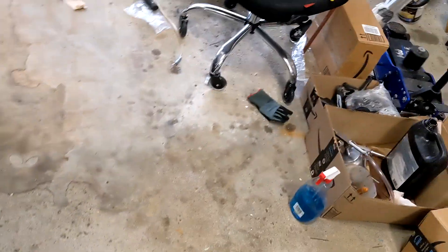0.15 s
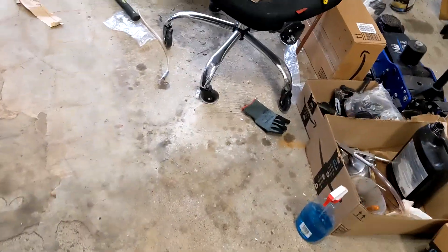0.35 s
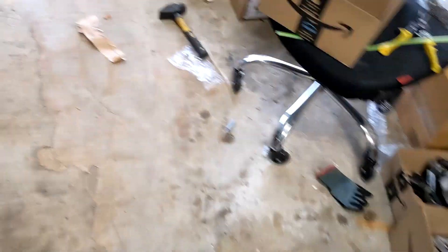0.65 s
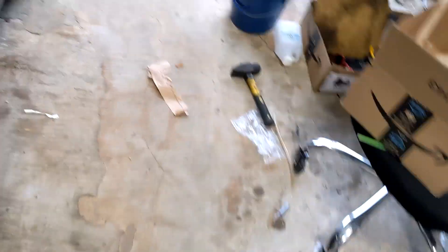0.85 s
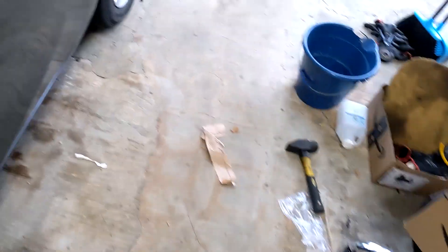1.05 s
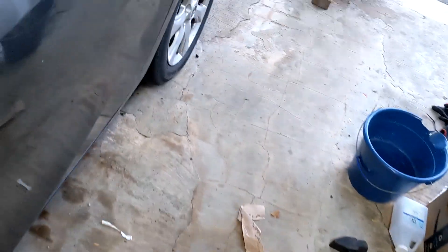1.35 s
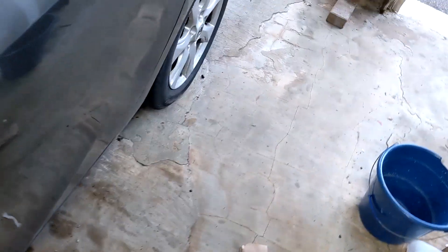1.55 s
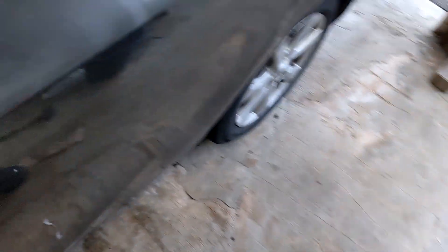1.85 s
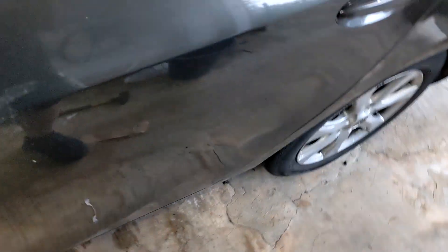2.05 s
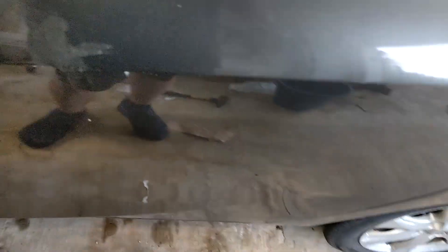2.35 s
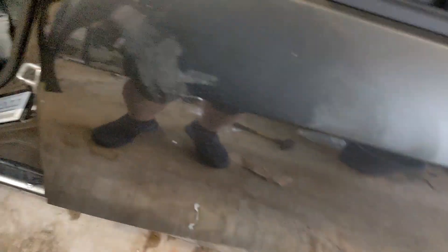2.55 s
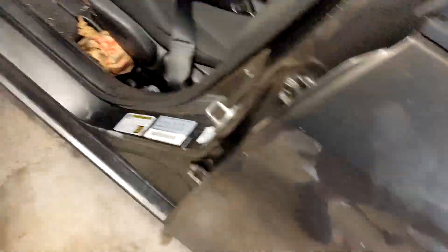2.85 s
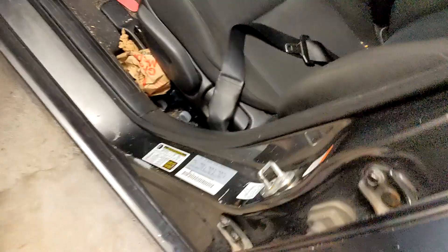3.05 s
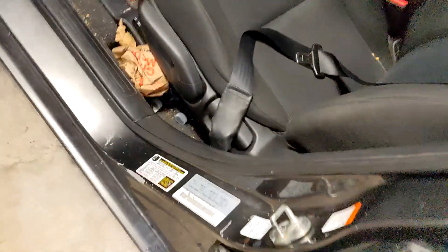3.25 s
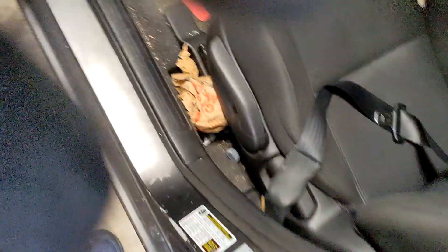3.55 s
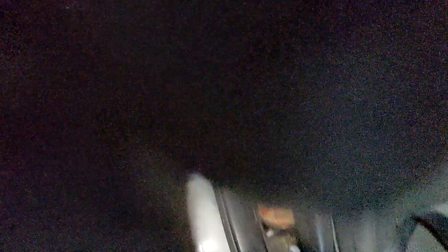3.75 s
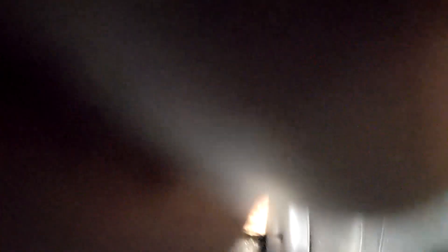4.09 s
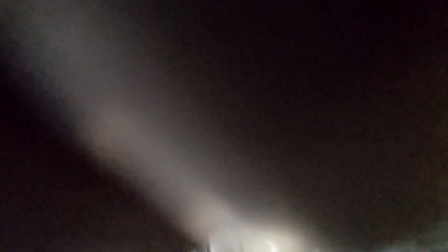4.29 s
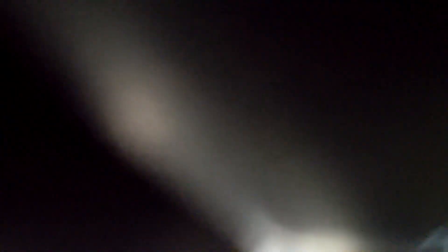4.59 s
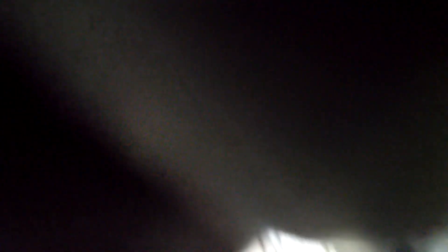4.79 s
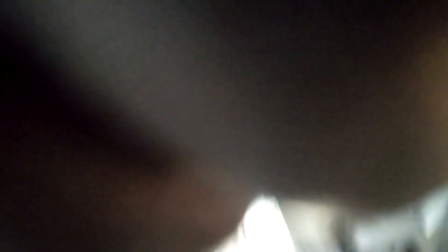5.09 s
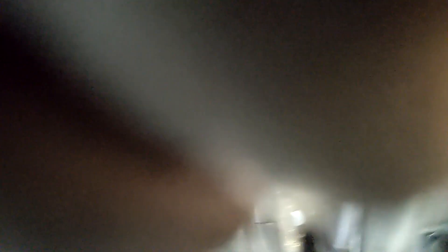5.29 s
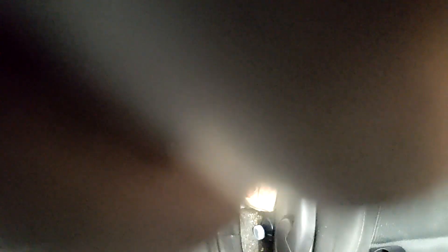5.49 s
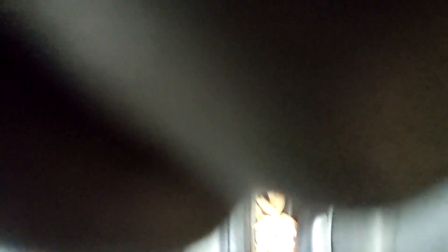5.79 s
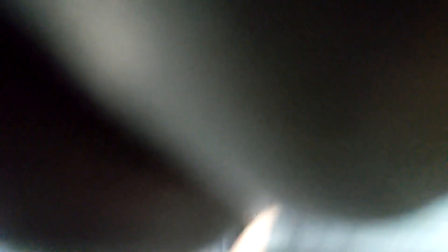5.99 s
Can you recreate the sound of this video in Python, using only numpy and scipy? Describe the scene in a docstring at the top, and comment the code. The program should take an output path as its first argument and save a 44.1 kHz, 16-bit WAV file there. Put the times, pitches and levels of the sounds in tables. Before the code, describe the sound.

Someone takes a few soft, shuffling steps over gritty concrete in a quiet garage. A car door opens with a quick run of clunks from the handle and latch, and its swing pushes a deep puff of air against the microphone. A sharp knock on the trim follows. Clothes rustle, then a bunch of keys clashes and rings very close in short bright bursts, ending in a few light clinks.

```python
"""Car door and keys in a garage.

Someone shuffles over concrete and opens a car door: the handle pulls, the latch lets go, the handle
snaps back, each blow ringing the panels, and the swinging door puffs air at the microphone. A sharp
knock on the trim follows as they lean in, clothes rustle, and keys clash and ring close by in the
cabin. Two faint hums and a far trill lie underneath."""
import sys
import numpy as np
from scipy import signal
from scipy.fft import rfft, irfft
from scipy.io import wavfile
from scipy.ndimage import uniform_filter1d, minimum_filter1d

SR = 44100
rng = np.random.default_rng(int(sys.argv[2]) if len(sys.argv) > 2 else 0)


def wav_record(signal):
    """Record a signal, one row per channel, as 16-bit PCM in the file named by sys.argv[1]."""
    frames = np.transpose(np.atleast_2d(signal))
    bounded = np.clip(frames, -1, 1)
    # unit amplitude maps onto the largest positive 16-bit level
    quanta = np.round(bounded * 32767).astype(np.int16)
    wavfile.write(sys.argv[1], SR, quanta)


N = 270333
TIME = np.arange(N) / SR
AFTER = np.arange(SR // 2) / SR   # time since a contact
LEFT_RIGHT = np.array([[.5], [-.5]])   # splits a level or phase between the channels


def from_db(db):
    """Decibels to gain."""
    return 10 ** (np.asarray(db) / 20)


def unit_power(x):
    """Scale to RMS 1."""
    return x / np.sqrt(np.mean(x ** 2) + 1e-20)


def unit_onset(x):
    """Scale to RMS 1 over the first 20 ms."""
    return x / np.std(x[:, :SR // 50])


def at_hz(points, hz):
    """Interpolate a table over log frequency."""
    knots_hz, values = np.transpose(points)
    return np.interp(np.log(hz), np.log(knots_hz), values)


def fade(t60):
    """Decay of 60 dB in t60 seconds."""
    return np.exp(-np.log(1000) * AFTER / max(t60, 1e-3))


def swell(rise_s):
    """Smooth onset of a contact."""
    return 1 - np.exp(-(AFTER / max(rise_s, 1e-4)) ** 2)


def stroke(start, length, attack_share=0.093, release_t60=0.29):
    """Envelope of a movement: attack, hold, release."""
    attack = np.clip((TIME - start) / max(attack_share * length, 1e-3), 0, 1)
    return attack * from_db(-60 * np.clip((TIME - start - length) / release_t60, 0, 2))


def drift(per_s):
    """Random curve through Gaussian knots."""
    knots = rng.standard_normal(4096)
    return np.interp(TIME * per_s, np.arange(len(knots)), knots)


def add(out, s, sound):
    """Mix a sound in at time s."""
    start = max(round(s * SR), 0)
    out[:, start:start + sound.shape[-1]] += sound[..., :max(N - start, 0)]


def band(x, low, high, order=2):
    """Band-pass that preserves the power of white noise."""
    high = min(high, .45 * SR)
    sos = signal.butter(order, [low, high], "band", fs=SR, output="sos")
    return signal.sosfilt(sos, x + 1e-18) * np.sqrt(SR / 2 / (high - low))


def high_pass(x, hz):
    """Fourth-order low cut."""
    return signal.sosfilt(signal.butter(4, hz, "high", fs=SR, output="sos"), x)


def resonance(x, hz, width_hz):
    """Two-pole resonator, peak gain 1."""
    r = np.exp(-np.pi * width_hz / SR)
    feedback = [1, -2 * r * np.cos(2 * np.pi * hz / SR), r * r]
    return signal.lfilter(np.array([1, 0, -1]) * (1 - r * r) / 2, feedback, x + 1e-18)


def ring(hz, t60, turn):
    """Struck mode, left and right `turn` radians apart."""
    return fade(t60) * np.sin(2 * np.pi * hz * AFTER + turn * LEFT_RIGHT)


def pair_up(pair, correlation):
    """Mix two independent signals to a correlated stereo pair."""
    mid = np.sqrt(1 + correlation) * pair[0]
    side = np.sqrt(1 - correlation) * pair[1]
    return np.array([mid + side, mid - side]) / np.sqrt(2)


def from_side(x, lag_s):
    """Delay the far channel; a positive lag delays the left."""
    late = round(abs(lag_s) * SR)
    delayed = np.pad(x, ((0, 0), (late, 0)))[:, :x.shape[1]]
    return np.array([delayed[0], x[1]] if lag_s > 0 else [x[0], delayed[1]])


# diffuse field: f/Hz, left-right correlation
COHERENCE = [(60, 0.89), (500, 0.75), (1100, 0.0267), (2200, 0.055), (4500, 0.052), (15000, 0.06)]


def diffuse(pair, hz):
    """Diffuse sound: the channels agree only at low frequencies."""
    return pair_up(pair, at_hz(COHERENCE, hz))


def noise(spectrum):
    """Diffuse noise of power 1, falling 24 dB/oct beyond the ends of its spectrum."""
    hz = np.maximum(np.fft.rfftfreq(N, 1 / SR), 1)
    outside = np.maximum(spectrum[0][0] / hz, hz / spectrum[-1][0])
    gain = from_db(at_hz(spectrum, hz)) / np.maximum(1, outside) ** 4
    white = rfft(rng.standard_normal((2, N)))
    return unit_power(irfft(diffuse(white, hz) * gain, N))


def chatter(t60, crack_db, crack_t60, grain_db, rise_s):
    """Noise burst of one contact: a crack, then ever weaker micro-collisions."""
    held = np.repeat(rng.standard_normal(len(AFTER)), 24)[:len(AFTER)]
    grains = unit_power(from_db(grain_db * held))
    envelope = (grains * fade(t60) + from_db(crack_db) * fade(crack_t60)) * swell(rise_s)
    return rng.standard_normal((2, len(AFTER))) * envelope


PART_OCTAVES = np.log2(np.array([95, 350, 1500, 5400, 11000]) / 1500)   # boom, body, clack, snap, fizz
BODY_CORRELATION, CLACK_CORRELATION, CLACK_TOP_HZ = .93, .6, 2400


def blow(burst, boom_db, body_db, clack_db, snap_db, fizz_db, peaks=(), top_hz=CLACK_TOP_HZ):
    """Colour a contact: heavy parts boom, panels knock, hard edges clack in their resonances and snap."""
    thud = rng.standard_normal(burst.shape) * fade(0.28)
    boom = band(diffuse(thud, 90), 55, 196, order=3)
    body = band(pair_up(burst, BODY_CORRELATION), 193, 807, order=4)
    edge = band(pair_up(burst, CLACK_CORRELATION), 710, top_hz, order=7)
    clack = 0.33 * edge + sum(from_db(db) * resonance(edge, hz, width) for hz, width, db in peaks)
    treble = from_db(snap_db) * band(burst, 1610, 7820) + from_db(fizz_db) * band(burst, 5220, 15160)
    return from_db(boom_db) * boom + from_db(body_db) * body + from_db(clack_db) * clack + treble


# room air spectrum: f/Hz, level/dB
AIR = [(18, -39), (30, -21), (79, -14), (303, -10), (374, 0), (540, -4.5), (1280, -2), (1960, -1),
       (2290, -14.5), (4530, -38.5), (5040, -41), (9970, -17), (16000, -18)]


def room_air(air_db=-71.5, whine_db=-76):
    """Steady noise floor with a faint breathy tone."""
    whine = unit_power(resonance(rng.standard_normal((2, N)), hz=1400, width_hz=90))
    return from_db(air_db) * noise(AIR) + from_db(whine_db) * whine


# hums: f/Hz, waver/Hz, level/dB, nearest from t/s, until t/s
HUMS = [(76.6, 1.9, -64, 0.13, 0.8), (173, 1.6, -61.5, 0.65, 1)]


def hums(approach_db_per_s=26, leave_db_per_s=20.5, far_db=-21):
    """Two wavering tones, loudest while walking past them."""
    out = np.zeros(N)
    for hz, waver_hz, db, start, end in HUMS:
        away_db = approach_db_per_s * np.maximum(start - TIME, 0)
        away_db += leave_db_per_s * np.maximum(TIME - end, 0)
        phase = 2 * np.pi * np.cumsum(hz + waver_hz * drift(4 * waver_hz)) / SR
        level = from_db(db + np.maximum(-away_db, far_db) + 2 * drift(5.7))
        out += level * np.sqrt(2) * np.sin(phase)
    return out


# friction spectra, dull to bright: f/Hz, level/dB
RUB = [(38, -2.5), (65, 5.5), (120, 9), (200, 4.5), (330, -3), (550, -1), (800, -7), (1300, -19)]
SWISH = [(600, 0.5), (950, -4), (1150, -2), (1380, 4), (1600, -10), (1950, -3.5), (2350, 0.5), (2750, -6.5),
         (3200, -2), (5000, -24.5)]
HISS = [(2500, -32), (4200, 5), (5500, 0.5), (7500, 3.5), (10000, -3.5), (15000, -3.5)]
# handling rumble, one curve before and one after the door opens: t/s, level/dB
HANDLING = [
    [(0.0, -71), (0.138, -61.5), (0.226, -62.5), (0.69, -63), (1.204, -63.5), (1.85, -58.5)],
    [(2.8, -57), (3.19, -70.5), (4.61, -72.5), (4.83, -59), (5.19, -69), (6.13, -67.5)],
]
# strokes of sleeves, soles and door seal: t/s, length/s, swish/dB, hiss/dB re swish
STROKES = [(-.01, 0.13, -55.5, -5.5), (0.58, 0.26, -58, -3.5), (1.301, 0.0069, -48, -4),
           (1.385, 0.15, -61, -4.5), (1.69, 0.085, -77, 8), (2.12, 0.071, -49, 0),
           (2.247, 0.068, -48, -8.5), (2.397, 0.05, -55, -0.5), (2.63, 0.25, -69, -4.5),
           (3.083, 0.02, -47.5, -3), (3.266, 0.26, -58.5, -1), (3.647, 0.11, -56.5, -7.5),
           (3.791, 0.1, -52.5, -4), (4.016, 0.007, -55, -7), (4.062, 0.013, -46.5, -7.5),
           (4.175, 0.15, -66.5, -12), (4.61, 0.1, -49, -4.5), (4.718, 0.085, -43.5, -1),
           (4.862, 0.16, -50, 2), (5.128, 0.23, -60.5, 2.5), (5.782, 0.55, -65, -5)]


def rustle(rub_db=-9, idle_swish_db=-70, idle_hiss_db=-72.5):
    """Cloth and soles rub in small catches over a handling rumble; clothes never keep quite still."""
    swish_level, hiss_level = 0, 0
    for start, length, db, hiss_db in STROKES:
        level = from_db(db) * stroke(start, length)
        swish_level += level
        hiss_level += from_db(hiss_db) * level
    catches = from_db(1.5 * drift(350) + drift(49))
    rumble = from_db(np.interp(TIME, *np.vstack(HANDLING).T)) * noise(RUB)
    rub = from_db(rub_db) * swish_level * unit_power(band(noise(RUB), 201.5, 610))
    swish = np.hypot(swish_level, from_db(idle_swish_db)) * noise(SWISH)
    hiss = np.hypot(hiss_level, from_db(idle_hiss_db)) * noise(HISS)
    return rumble + rub + catches * (swish + hiss)


# small contacts: t/s, level/dB, tilt/(dB/oct), resonance f/Hz, t60/s, crack/dB
TAPS = [(.007, -49, 0, 2100, 0.048, 9), (0.607, -52, 1.5, 1220, 0.31, -5),
        (.721, -41.5, 0.5, 1520, 0.047, 4.5), (0.793, -53.5, -1, 1470, 0.078, -6),
        (1.304, -51, 7.5, 1400, 0.13, 2), (1.4586, -54, 0.5, 2380, 0.036, 14),
        (2.026, -30, 0, 2120, 0.042, 1.5), (2.345, -24.5, -2, 1740, 0.026, 5.5),
        (3.215, -47.5, 2, 7040, 0.03, -3), (3.524, -45.5, -3, 980, 0.032, -1),
        (3.777, -48, 4, 2620, 0.092, 13.5), (3.8324, -48.5, 3.5, 2820, 0.033, 11),
        (3.888, -42, -2, 1130, 0.034, 7), (4.086, -46.5, 4.5, 1440, 0.061, -18),
        (4.723, -43.5, -3.5, 1290, 0.059, -3), (4.734, -50, -2.5, 2300, 0.025, 7),
        (4.776, -45, -1.5, 1320, 0.047, 7), (4.794, -39, -3, 2480, 0.027, 8.5),
        (4.853, -43.5, -4.5, 1300, 0.081, -2.5), (4.886, -37, 5, 2200, 0.062, 8.5),
        (5.027, -50, 2.5, 1410, 0.032, 11.5), (5.142, -42.5, 3.5, 2200, 0.16, -11.5),
        (5.149, -46.5, -0.5, 1380, 0.11, -2.5), (5.283, -53, 1.5, 2380, 0.091, -8),
        (5.305, -53.5, 1, 2380, 0.26, -17), (5.527, -56.5, 4, 1710, .02, 5.5)]
TAP_PARTS_DB = (-37.5, -6, 0.5, -6.5, -9.5)   # boom, body, clack, snap, fizz


def taps(level_db=-1, q=3.5, peak_db=8):
    """Grit underfoot, latch, trim and key fob: a crack, then gritty contacts in one broad resonance."""
    out = np.zeros((2, N))
    for s, db, tilt, hz, t60, crack_db in TAPS:
        burst = chatter(t60, crack_db, crack_t60=.012, grain_db=5.5, rise_s=.0005)
        parts_db = db + np.array(TAP_PARTS_DB) + tilt * PART_OCTAVES
        top_hz = max(CLACK_TOP_HZ, 1.254 * hz)
        add(out, s, blow(burst, *parts_db, peaks=[(hz, hz / q, peak_db)], top_hz=top_hz))
    return from_db(level_db) * out


# sole scrapes: t/s, length/s, level/dB
SCUFFS = [(0.01, 0.041, -47), (1.467, 0.037, -52)]
# scrape spectrum: f/Hz, level/dB
RASP = [(1000, -23), (1800, -9), (2350, -2), (2700, -10), (3200, -10), (4500, -17.5), (8000, -24.5)]


def scuffs(catches_per_s=600):
    """A sole drags over gritty concrete with a narrow rasp."""
    level = sum(from_db(db) * stroke(start, length) for start, length, db in SCUFFS)
    return level * from_db(drift(catches_per_s)) * noise(RASP)


# trills: t/s, length/s, level/dB
TRILLS = [(0.097, 0.25, -76), (0.474, 0.065, -74), (0.788, 0.21, -76), (1.65, 0.087, -80),
          (2.997, 0.09, -71), (4.114, 0.28, -82)]


def far_trill(hz=4440, waver_hz=50):
    """A faint high tone comes and goes, fluttering in pitch and strength."""
    phase = 2 * np.pi * np.cumsum(hz + waver_hz * drift(160)) / SR
    trill = unit_power(np.sin(phase) * np.array([drift(120), drift(120)]))
    return trill * sum(from_db(db) * stroke(start, length) for start, length, db in TRILLS)


# footfalls: t/s, level/dB, heel f/Hz, heel level/dB
STEPS = [(0.52, -54, 182, -36.5), (.608, -44, 280, -43), (0.732, -53, 250, -37.5), (1.408, -54.5, 554, -46),
         (1.533, -44, 202, -36), (1.57, -48, 476, -44.5), (1.581, -57, 276, -44)]
STEP_PARTS_DB = (-4.5, -2, -31, -13, -27)   # boom, body, clack, snap, fizz


def steps(sole_hz=1900, q=3.5, t60=0.14):
    """Soft soles land on concrete with a dull thud and a short hollow knock of the heel."""
    out = np.zeros((2, N))
    for s, db, heel_hz, heel_db in STEPS:
        burst = chatter(t60, crack_db=7.5, crack_t60=0.017, grain_db=14, rise_s=0.036 * t60)
        heel = from_db(heel_db) * ring(heel_hz, t60=.07, turn=0) * swell(1 / heel_hz)
        sole = blow(burst, *(db + np.array(STEP_PARTS_DB)), peaks=[(sole_hz, sole_hz / q, 0)])
        add(out, s, heel + sole)
    return out


# door panel modes: f/Hz, level/dB, t60/s
DOOR_MODES = [(60, 2, 0.078), (121.4, -3.5, 0.23), (177, -10, 0.56), (231.2, 11, 0.22), (385, -10, 0.18),
              (501, -2, 0.25), (674, 6, 0.27), (744, -30, 0.33), (1140, -14, 0.112), (1350, -12, 0.072),
              (1700, -5, 0.117), (2260, -14, 0.21), (2500, -22, 0.22)]
# resonances of the hollow car body: f/Hz, width/Hz, level/dB
CAVITY = [(1174, 410, -4), (1384, 210, 7), (1830, 260, 2.5), (2430, 87, 4)]
# handle, latch and seal blows: t/s, level/dB, tilt/(dB/oct), boom/dB, clunk f/Hz, clunk/dB
DOOR_BLOWS = [(1.903, -39, 0.5, -42.5, 567, -35), (1.913, -31.5, -1.5, -34, 580, -19.5),
              (1.924, -46, -1.5, -36.5, 413, -23), (1.943, -32, -1, -27, 540, -42),
              (1.963, -36, -2, -38, 637, -22), (1.98, -56.5, 5.5, -24, 456, -25.5),
              (2.009, -48, 3, -45, 550, -28), (2.026, -28, 1.5, -29, 461, -15.5),
              (2.042, -39.5, -16, -50.5, 435, -17.5), (2.0656, -33.5, -9, -44, 692, -17),
              (2.08, -55, 5, -25, 320, -18.5), (2.1, -43.5, 2.5, -34, 408, -25.5),
              (2.13, -52, 5, -53, 544, -30), (2.19, -49, 8, -50, 503, -42),
              (2.287, -34, -0.5, -37, 535, -25.5), (2.343, -23, 1.5, -40, 625, -16),
              (2.356, -31, -6, -35.5, 230, -17), (2.371, -34, -2, -25, 501, -17),
              (2.396, -33.5, -0.5, -46.5, 225, -18), (2.476, -43.5, -1, -32.5, 400, -56)]
DOOR_PARTS_DB = (4, -3, -9.5)   # body, clack, snap


def door(level_db=-2.5, modes_db=-21.5, shudder_db=-12.5, unlatch_s=2.0):
    """Each blow clunks and rings the panels; once unlatched, the door's mass booms and shudders on."""
    out, shudder_power = np.zeros((2, N)), np.zeros((1, N))
    for s, db, tilt, boom_db, clunk_hz, clunk_db in DOOR_BLOWS:
        body_db, clack_db, snap_db = db + np.array(DOOR_PARTS_DB) + tilt * (PART_OCTAVES[1:4] + 1)
        burst = chatter(t60=0.088, crack_db=-8, crack_t60=0.0021, grain_db=-1.5, rise_s=0.0012)
        sound = blow(burst, boom_db, body_db, clack_db, snap_db, fizz_db=snap_db - 7.5, peaks=CAVITY)
        drive = [(100, boom_db), (230, body_db), (600, body_db), (1200, clack_db)]
        for hz, mode_db, t60 in DOOR_MODES:
            strength, turn = rng.standard_normal(2)
            gain = from_db(at_hz(drive, hz) + mode_db + modes_db + 2 * strength)
            sound += gain * ring(hz, t60, turn * min(hz / 1000, 2)) * swell(0.9 / hz)
        sound += from_db(clunk_db) * ring(clunk_hz, t60=.065, turn=0) * swell(0.24 / clunk_hz)
        if s < unlatch_s:
            sound = high_pass(sound, hz=137)   # the latch blocks the deepest swing
        else:
            shudder = from_db(boom_db + shudder_db) * fade(t60=1) * swell(0.0057)
            add(shudder_power, s, shudder ** 2)
        add(out, s, from_db(level_db) * sound)
    return out + np.sqrt(shudder_power) * noise(RUB)


# eddies off the moving door: t/s, level/dB, starting f/Hz
EDDIES = [(2.067, -15, 60), (2.622, -14, 247), (2.637, -11.5, 140), (2.65, -15.5, 337), (2.688, -16.5, 455),
          (2.748, -27, 120), (2.769, -29, 138), (2.88, -34, 93.5)]


def puffs(level_db=3, left_db=-49, end_hz=71, slowing_s=0.0049, t60=0.088):
    """Eddies push on the right microphone port: damped pressure swings that slow as they die."""
    out = np.zeros((2, N))
    for s, db, start_hz in EDDIES:
        hz = end_hz + (start_hz - end_hz) * np.exp(-AFTER / slowing_s)
        envelope = (1 - np.exp(-AFTER * start_hz * 2)) * fade(t60)
        swing = -np.sin(2 * np.pi * np.cumsum(hz) / SR) * envelope
        add(out, s, from_db(db + level_db) * swing * from_db([[left_db], [0]]))
    return out


# trim panel modes: f/Hz, level/dB, t60/s
TRIM_MODES = [(237, -11, .19), (420, -9, .09), (500, -2, .13), (754, -3, .07), (1351, -11, .11),
              (1750, -5.5, .12), (2070, -9, .07), (2240, -6, .17), (2369, -2, .11), (2480, -13, .08),
              (3140, -12, .12), (3720, -18, .08)]
# graze, landing, seating and rattle: t/s, level/dB, tilt/(dB/oct)
KNOCK_CONTACTS = [(3.582, -38.5, -2.5), (3.5865, -23, 0), (3.5902, -28.5, 5), (3.603, -27, 3),
                  (3.612, -34, 6)]
KNOCK_PARTS_DB = (-31.5, -4, 3.5, -13, -20.5)   # boom, body, clack, snap, fizz


def knock(level_db=-3.5, modes_db=-1, scatter_s=.0006):
    """A stiff trim panel is hit hard: a quick cluster of contacts, each ringing its modes anew."""
    out = np.zeros((2, N))
    for s, db, tilt in KNOCK_CONTACTS:
        burst = chatter(t60=0.1, crack_db=11, crack_t60=0.016, grain_db=-1, rise_s=0.0014)
        parts_db = db + np.array(KNOCK_PARTS_DB) + tilt * PART_OCTAVES
        add(out, s, blow(burst, *parts_db))
        for hz, mode_db, t60 in TRIM_MODES:
            strength, late, turn = rng.standard_normal(3)
            drive_db = db + tilt * np.log2(hz / 1500) + 1.5 * strength
            mode = ring(hz, t60, turn * min(hz / 1500, 1)) * swell(.5 / hz)
            add(out, s + abs(late) * scatter_s, from_db(drive_db + mode_db + modes_db) * mode)
    return from_db(level_db) * out


CLINK_RISE_S, CLASH_T60_S = 0.0016, .085


def key_pan_db(hz):
    """The keys hang to the left; their highest partials lean there most."""
    return (9 if hz > 12000 else 6.5) * LEFT_RIGHT


def stray_partials(t60=0.078, count=16):
    """Each touch catches the keys at other spots and rings a new handful of short partials."""
    partials = sum(size * ring(5800 + 9900 * place, t60 * (.5 + size), 2 * np.pi * turn)
                   for place, size, turn in rng.random((count, 3)))
    return unit_onset(partials) * swell(CLINK_RISE_S)


# mode families of keys pressed together: f/Hz, width/Hz, level/dB
CLASH_PEAKS = [(6220, 330, 16), (7000, 400, 8), (10280, 380, 18), (14250, 650, 20), (15500, 400, 13)]


def key_clash(burst_db=-3.5, stray_db=-1):
    """Keys pressed together ring only briefly, in broad peaks and stray partials."""
    burst = chatter(CLASH_T60_S, crack_db=0, crack_t60=0.008, grain_db=4, rise_s=CLINK_RISE_S)
    peaks = sum(from_db(db + key_pan_db(hz)) * resonance(burst, hz, width)
                for hz, width, db in CLASH_PEAKS)
    bright = high_pass(1.95 * band(burst, 7000, 17200) + peaks, hz=5500)
    clash = bright + 0.23 * band(burst, 2600, 4600)
    return from_db(burst_db) * clash + from_db(stray_db) * stray_partials()


def key_clack():
    """The bunch clacks against the hand and its ring gives a dull clank."""
    rattle = chatter(CLASH_T60_S, crack_db=2, crack_t60=.01, grain_db=5, rise_s=CLINK_RISE_S)
    clack = band(pair_up(rattle, CLACK_CORRELATION), 880, 3270)
    clank = from_db(5.5) * resonance(clack, hz=2300, width_hz=240)
    body = from_db(-13.5) * band(pair_up(rattle, BODY_CORRELATION), 196, 570)
    return from_side(0.83 * clack + clank + body, lag_s=-0.00026)


# key blade modes: f/Hz, level/dB, nominal t60/s
KEY_MODES = [(6082, 0, .11), (6178, 0, .13), (6440, -5, .1), (6830, -14, .2), (7014, -13, .2),
             (8765, -19, .14), (9235, -16, .13), (10180, -9, .08), (10224, -2, .15), (10518, -6, .1),
             (13280, -17, .08), (13552, -17, .07), (13738, -3, .11), (14012, 2, .11), (14265, -15, .09),
             (14563, -17, .1)]


def key_blades(freedom, lower_db, vary_db=7, bounce_db=1, bounces_per_s=350):
    """Blades bounce and ring on; touching neighbours damp and slightly detune each mode."""
    low_db, middle_db = -19 + lower_db, -6.5 + .5 * lower_db
    drive = [(7000, low_db), (9000, middle_db), (11000, middle_db), (13000, 0)]
    blades = 0
    for hz, mode_db, t60 in KEY_MODES:
        strength, detune, turn = rng.standard_normal(3)
        gain = from_db(at_hz(drive, hz) + mode_db + vary_db * strength + key_pan_db(hz))
        shifted_hz = hz * (1 + 0.0092 * max(1 - freedom, 0) * detune)
        blades += gain * ring(shifted_hz, t60 * freedom, turn - 1.5)
    blades *= swell(CLINK_RISE_S)
    bounces = from_db(bounce_db) * rng.standard_normal(blades.shape) * fade(0.076)
    bounces *= rng.random(len(AFTER)) < bounces_per_s / SR
    return unit_onset(blades + signal.fftconvolve(blades, bounces, axes=1)[:, :len(AFTER)])


# keys stirring: start t/s, end t/s, level/dB
STIRRING = [(4.692, 4.87, -32.5), (5.044, 5.11, -47.5), (5.753, 5.87, -52.5)]


def key_touches(per_s=42):
    """Light touches at uneven intervals, as rows like CLINKS."""
    rows = []
    for start, end, db in STIRRING:
        times = start + (np.arange(16) + rng.random(16)) / per_s
        rows += [(s, db, 0, 0) for s in times if s < end]
    return rows


# clearest key hits: t/s, level/dB, extra clash of a blunt hit/dB, lower partials/dB
CLINKS = [(4.617, -45.5, 8, -4), (4.6263, -55, 4, -6), (4.6635, -45, 5, -3), (4.677, -39, 9, 2),
          (4.691, -35, -2, 8), (4.7026, -36.5, 4, 8), (4.71, -29, -4, -4), (4.7326, -25, -1.5, 3),
          (4.74, -31.5, 2.5, -2), (4.753, -26, -2, 1), (4.762, -37, -3, -3), (4.7717, -23, -3, -1),
          (4.7843, -22.5, 4.5, -5), (4.801, -21, -2, -3), (4.823, -28, -10, -1), (4.8865, -32.5, 18.5, 3),
          (4.8922, -27.5, 7, -12.5), (4.906, -24, -4.5, -2), (4.953, -21, -10, 0), (4.9876, -21, 1.5, 6.5),
          (4.992, -16.5, -3, -6), (5.0673, -41, -3, -3), (5.0903, -44.5, 0, -3), (5.133, -42, -2, -14),
          (5.1814, -39, -5, -18), (5.218, -28.5, 1, 10), (5.268, -27, 4, 2), (5.282, -9.5, -11.5, -2),
          (5.2934, -10.5, -12.5, -8.5), (5.306, -23, -11, 9), (5.327, -25, -1.5, 11), (5.4026, -25, -5, 7),
          (5.407, -32, -0.5, 5), (5.498, -58.5, 15, 2), (5.624, -50.5, 9, 5), (5.6447, -41.5, 4.5, 6),
          (5.6531, -36, 8, -9), (5.916, -40.5, -1, 4), (6.0335, -48, 2, -6), (6.098, -45.5, 5, 8),
          (6.1163, -36, 1.5, -5)]
# bunch gathered in the hand, swinging free, held again: t/s, ring time factor
FREEDOM = [(4.65, 0.3), (4.95, 0.45), (4.99, 0.45), (5.13, 0.18), (5.21, 2.9), (5.29, 0.85), (5.41, 0.7),
           (5.5, 0.35), (5.65, 0.64), (5.92, 0.43), (6.1, 0.37)]


def keys(clash_db=-14.5, blades_db=-5.5, held_clack_db=-5, free_clack_db=-30.5):
    """Every hit clashes the whole bunch; held keys clack more, free ones ring longer."""
    out = np.zeros((2, N))
    for s, db, blunt_db, lower_db in CLINKS + key_touches():
        freedom = np.interp(s, *np.transpose(FREEDOM))
        clack_db = held_clack_db * (1 - freedom) + free_clack_db * freedom
        clash = from_db(clash_db + blunt_db) * key_clash()
        clack = from_db(clack_db + blunt_db) * key_clack()
        blades = from_db(blades_db) * key_blades(freedom, lower_db)
        add(out, s, from_db(db) * (clash + clack + blades))
    return out


# garage reverberation: f/Hz, t60/s
ROOM_T60 = [(80, 0.1), (260, 0.26), (700, 0.33), (2000, 0.39), (5000, 0.27), (14000, 0.4)]


def garage(x):
    """Diffuse echoes build up in a few milliseconds and die band by band."""
    edges_hz = np.geomspace(28, 17000, 20)
    tail = 0
    for low, high in zip(edges_hz, edges_hz[1:]):
        hz = np.sqrt(low * high)
        white = diffuse(rng.standard_normal((2, len(AFTER))), hz)
        tail += np.sqrt(high - low) * band(white, low, high) * fade(at_hz(ROOM_T60, hz))
    tail *= (1 - fade(0.0072)) ** 2
    tail /= np.sqrt(np.sum(tail ** 2) / 2)
    return signal.fftconvolve(x, tail, axes=1)[:, :N]


def scene():
    """Door and steps echo in the garage; the knock is drier, the keys close and nearly dry."""
    car = from_side(door(), lag_s=0.0003)
    walker = from_side(steps() + taps(), lag_s=0.00013)
    trim = from_side(knock(), lag_s=0.00013)
    bunch = keys()
    unechoed = rustle() + scuffs() + puffs() + room_air() + hums() + far_trill()
    send = from_db(-7.5) * car + from_db(-8) * walker + from_db(-11) * trim + from_db(-20) * bunch
    return car + walker + trim + bunch + garage(send) + unechoed


def limit(x, ceiling=.9, window=129):
    """Turn the gain down for a few milliseconds around peaks near full scale."""
    needed_gain = np.minimum(1, ceiling / (np.abs(x).max(axis=0) + 1e-9))
    return x * uniform_filter1d(minimum_filter1d(needed_gain, window), window)


# microphone port balance: f/Hz, left over right/dB
BALANCE = [(60, -0.5), (300, -4.5), (700, -2.5), (1300, -2), (2400, -4.5), (4400, -5), (8000, -5.5),
           (11000, -6), (13500, 4), (16000, -0.5)]


def record(dry, cutoff_hz=15800):
    """Each microphone port colours the sound; peaks are limited and the top is cut."""
    balance_db = at_hz(BALANCE, np.maximum(np.fft.rfftfreq(N, 1 / SR), 1))
    coloured = irfft(rfft(dry) * from_db(balance_db * LEFT_RIGHT), N)
    low_pass = signal.ellip(10, .1, 80, cutoff_hz, fs=SR, output="sos")
    return signal.sosfilt(low_pass, limit(coloured))


dry = scene()
out = record(dry)
wav_record(out)
```